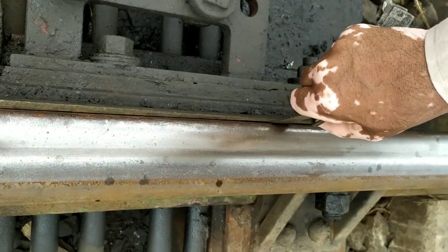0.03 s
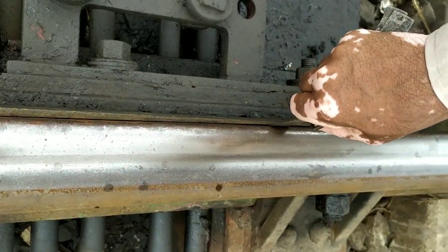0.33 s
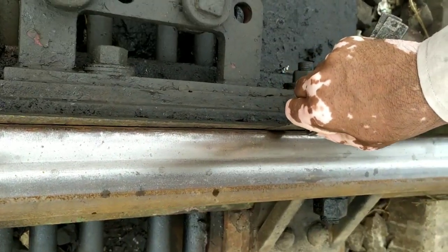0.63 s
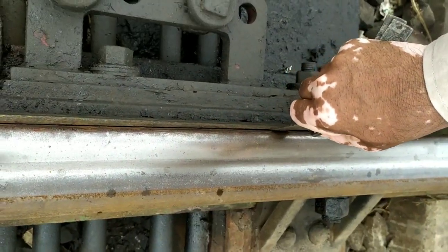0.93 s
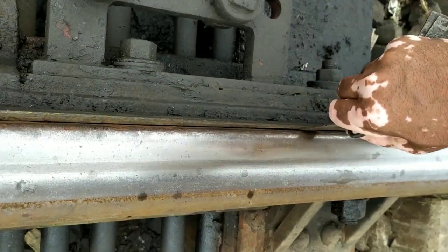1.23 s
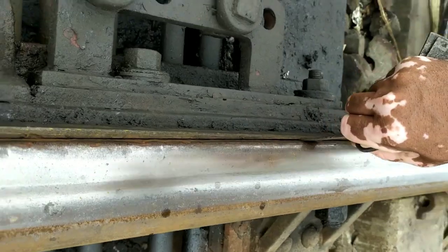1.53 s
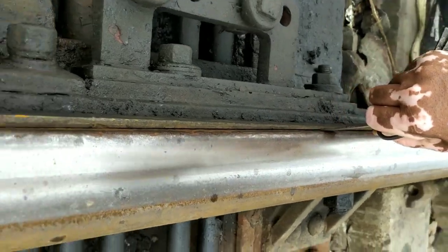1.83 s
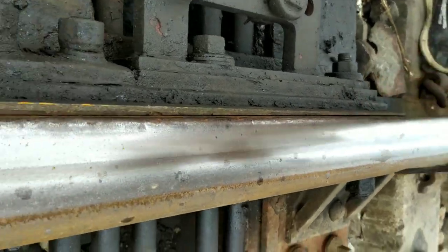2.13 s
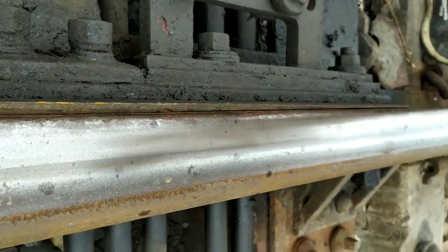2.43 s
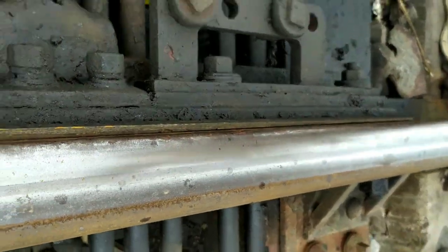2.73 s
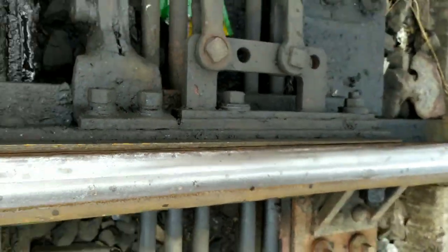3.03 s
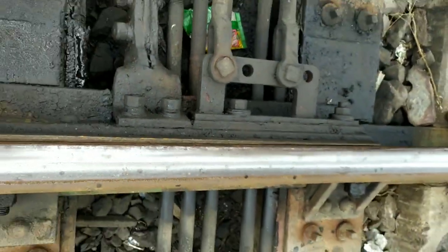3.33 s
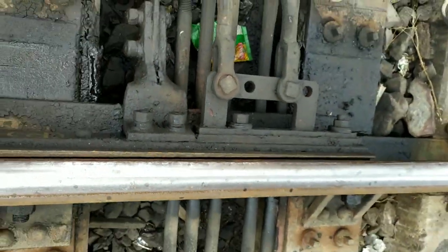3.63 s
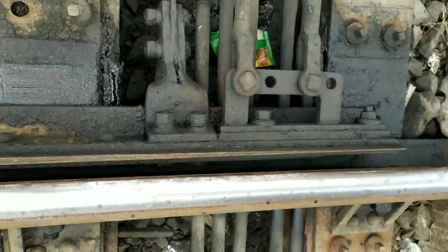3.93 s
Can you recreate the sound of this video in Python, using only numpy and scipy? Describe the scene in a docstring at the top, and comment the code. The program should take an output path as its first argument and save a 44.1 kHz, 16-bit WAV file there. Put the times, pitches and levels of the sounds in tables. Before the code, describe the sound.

A railway switch motor, heard close beside the track, winds up with whining, rattling gears, scraping steel and knocking rods. Before it starts, a soft click and a sharp tick sound over low outdoor rumble and a chirping bird.

```python
"""A low, uneven outdoor rumble and a faint steady tone, then a relay clicks beside a railway switch.
A small bird chirps, and a thin steel strip snaps off the rail with sharp ticks and a scrape.
From 3 s the point motor runs up: its gears whine at their mesh frequencies, tooth impacts excite
the modes of the housing into a rattle, and the rods clunk as they take the load."""
import sys
import numpy as np
from scipy import signal
from scipy.fft import rfft, irfft
from scipy.io import wavfile
from scipy.ndimage import uniform_filter1d

SR = 44100
rng = np.random.default_rng(int(sys.argv[2]) if len(sys.argv) > 2 else 0)


def int16_out(signal):
    """Quantize to a 16-bit WAV file."""
    q = np.round(np.clip(np.atleast_2d(signal).T, -1, 1) * 32767)
    wavfile.write(sys.argv[1], SR, q.astype(np.int16))


N = 176400
T = np.arange(N) / SR
HZ = np.fft.rfftfreq(N, 1 / SR)


def amp(db):
    """Decibels to amplitude ratio."""
    return 10 ** (np.asarray(db) / 20)


def unit(x):
    """Normalisation to rms 1."""
    return x / np.sqrt(np.mean(abs(x) ** 2) + 1e-20)


def curve(rows, column=1):
    """Linear interpolation of a column over time."""
    rows = np.array(rows)
    return np.interp(T, rows[:, 0], rows[:, column])


def per_bin(points):
    """Interpolation over log frequency."""
    hz, value = np.transpose(points)
    return np.interp(np.log(HZ + 1), np.log(hz + 1), value)


def noise():
    """Independent white noise for each ear."""
    return rng.standard_normal((2, N))


def wobble(rate_hz):
    """Random modulator: low-passed noise of rms 1."""
    return unit(irfft(rfft(rng.standard_normal(N)) / (1 + (HZ / rate_hz) ** 4), N))


def phase(hz):
    """Phase is the integral of frequency."""
    return 2 * np.pi * np.cumsum(hz) / SR


def resonance(hz, width_hz):
    """Unit-power response of two cascaded resonators."""
    return unit(1 / (1 + 2j * (HZ - hz) / width_hz) ** 2)


def shape(spectrum):
    """Unit-power response from relative levels."""
    return unit(amp(per_bin(spectrum)))


# Coherence of the switch's sound between the ears (frequency [Hz], correlation [-])
SWITCH_COHERENCE = [(50, .5), (90, .6), (150, .93), (300, .96), (600, .96), (1000, .75), (2300, .25),
                    (5000, -.1), (15000, 0)]
def colour(x, response, coherence=SWITCH_COHERENCE):
    """Filtering, then a cross-mix that sets interaural coherence."""
    left, other = rfft(x) * response
    shared = np.clip(per_bin(coherence), -1, 1)
    return irfft(np.array([left, shared * left + np.sqrt(1 - shared ** 2) * other]), N)


def pan(x, balance_db):
    """Interaural level difference, varying with frequency."""
    return irfft(rfft(x) * amp(np.array([[.5], [-.5]]) * per_bin(balance_db)), N)


def steady(x, seconds):
    """Division by the running rms flattens the envelope."""
    return x / np.sqrt(abs(uniform_filter1d((x ** 2).mean(0), int(seconds * SR))) + 1e-9)


def strike(s, db, rise, decay):
    """Impact envelope: linear rise, exponential decay."""
    return amp(db) * np.clip((T - s) / rise, 0, 1) * np.exp(-np.maximum(T - s - rise, 0) / decay)


def bursts(rows, spectrum):
    """Contact noise: impact envelopes sharing one spectrum."""
    return colour(noise() * sum(strike(*row) for row in rows), shape(spectrum))


NEAR_T60_S = .025
def echoes(x, t60):
    """Diffuse reflection from track and ballast: convolution with decaying noise."""
    tail = noise()[:, :SR // 2] * amp(-60 * T[:SR // 2] / t60)
    return signal.fftconvolve(x[None], tail / np.linalg.norm(tail[0]), axes=1)[:, :N]


# Spectra of rumble, distant wash and hiss (frequency [Hz], relative level [dB])
RUMBLE_SPECTRUM = [(15, -37), (30, -47), (42, -9), (54, -2.5), (82, -1.5), (105, -8.5), (160, -20.5),
                   (230, -33.5), (400, -60), (16000, -120)]
WASH_SPECTRUM = [(60, -20), (150, 0), (230, -3.5), (400, -9), (700, -19), (1500, -71), (16000, -90)]
HISS_SPECTRUM = [(290, -27), (500, -14), (800, 7), (1250, 2.5), (1800, 0.5), (2700, 1.5), (4300, 2),
                 (6000, -2.5), (7500, -6.5), (9500, -4.5), (11500, -12.5), (13600, -15), (16000, -23)]
# Envelopes of rumble, hiss and faint tone (time [s], level [dB])
RUMBLE_LEVEL = [(0, -43), (.12, -44), (.2, -36.5), (.28, -44.5), (.36, -38), (.45, -42.5), (.58, -49),
                (.64, -47.5), (1.5, -44), (1.86, -44), (2.52, -45.5), (4.0, -44.5)]
HISS_LEVEL = [(0, -58), (.55, -58.5), (.7, -55), (.95, -58), (1.5, -59), (3.0, -58.5)]
TONE_LEVEL = [(0, -71), (.24, -66), (.65, -62.5), (1.03, -61), (1.35, -72), (1.8, -84), (2.05, -70.5),
              (2.35, -64.5), (2.75, -68.5), (3.0, -76)]
# Coherence of the air (frequency [Hz], correlation [-])
AIR_COHERENCE = [(60, 0.81), (150, 0.71), (380, 0.84), (950, 0), (15000, 0.044)]
# Balance of the air (frequency [Hz], left minus right [dB])
AIR_BALANCE = [(60, -1), (150, -1), (380, 1.5), (950, 0.5), (2380, 0.5), (5980, 3.0), (15000, -1.5)]
def outdoors(wash_db=-58, tone_hz=920.5):
    """Ambient noise: a rumble swelling with wind and handling bumps, a wash, a hiss and a faint tone."""
    rumble = steady(colour(noise(), shape(RUMBLE_SPECTRUM), AIR_COHERENCE), 0.07)
    rumble *= amp(curve(RUMBLE_LEVEL))
    wash = colour(noise(), shape(WASH_SPECTRUM), AIR_COHERENCE) * amp(wash_db)
    hiss = colour(noise(), shape(HISS_SPECTRUM), AIR_COHERENCE)
    hiss *= amp(curve(HISS_LEVEL) + 0.6 * wobble(12))
    tone = np.sqrt(2) * np.sin(phase(tone_hz + 0.3 * wobble(8.4))) * amp(curve(TONE_LEVEL))
    return pan(rumble + wash + hiss + tone, AIR_BALANCE)


# Thuds and clanks (time [s], level [dB], frequency [Hz], bandwidth [Hz], decay [s])
THUD_HITS = [(0.004, -45.5, 179.5, 40, 0.06), (1.08, -45, 760, 260, 0.0026), (1.311, -37.5, 123, 60, 0.026),
             (2.019, -39.5, 312, 69.4, 0.021), (2.02, -47, 486, 199, 0.031),
             (3.433, -33.5, 286, 117, 0.035), (3.427, -32, 1970, 160, 0.0089),
             (3.447, -24.5, 518, 160, 0.011), (3.458, -35, 274, 50, .025)]
def thuds():
    """Damped resonance: each blow excites one narrow band, rising in about one period."""
    out = 0
    for s, db, hz, width, decay in THUD_HITS:
        band = steady(colour(noise(), resonance(hz, width)), 0.0107)
        out += band * strike(s, db, 1.05 / hz, decay)
    return out


# Closure and bounce (time [s], level [dB], rise [s], decay [s])
RELAY_HITS = [(0.086, -46.5, 0.0043, 0.0084), (0.1, -52.5, 0.0011, 0.018)]
# Contact noise (frequency [Hz], relative level [dB])
RELAY_SPECTRUM = [(200, -5), (550, 0), (850, 1), (1400, 1), (2400, -5), (4500, -8), (7000, -18),
                  (16000, -40)]
# Modes of the relay box (frequency [Hz], level [dB], decay [s])
BOX_MODES = [(560, -47.5, 0.019), (1430, -55, 0.011), (2380, -60, 0.017), (3666, -59, .01)]
def relay():
    """Free vibration: the relay closes, bounces once and leaves its box ringing."""
    onset = RELAY_HITS[0][0]
    ring = sum(np.sin(2 * np.pi * hz * T) * strike(onset, db, 0.0052, decay)
               for hz, db, decay in BOX_MODES)
    return bursts(RELAY_HITS, RELAY_SPECTRUM) + ring


# Calls (time [s], level of low notes [dB], level of high falling note [dB])
BIRD_CALLS = [(0.19, -62, -68), (0.43, -62, -66), (1.179, -62, -70), (1.42, -61, -70), (2.406, -49, -47.5),
              (2.647, -46.5, -44.5), (2.882, -45, -46), (3.123, -45, -47), (3.606, -42, -52)]
# Notes of a call (delay [s], duration [s], start [Hz], middle [Hz], end [Hz], relative level [dB])
BIRD_NOTES = [(-.034, .026, 4000, 4100, 4070, -7.5), (0, .028, 6440, 6000, 4590, -4),
              (0.026, .048, 3340, 4477, 4800, -1)]
def bird(high_above_hz=6000, far_db=-1.5, near_db=-2.5):
    """Frequency modulation: each call is a soft flat note, a quick high fall and a rising sweep."""
    song = np.zeros(N)
    for s, low_db, high_db in BIRD_CALLS:
        for delay, length, start, middle, end, db in BIRD_NOTES:
            progress = np.arange(0, 1, 1 / (length * SR))
            glide = np.polyval(np.polyfit([0, .5, 1], [start, middle, end], 2), progress)
            hz = glide * (1 + 0.0043 * rng.standard_normal())
            gain = amp(db + (high_db if start > high_above_hz else low_db))
            note = gain * abs(np.sin(np.pi * progress)) ** .6 * np.sin(phase(hz))
            at = max(round((s + delay) * SR), 0)
            song[at:at + len(note)] += note
    return song + amp(far_db) * echoes(song, t60=0.52) + amp(near_db) * echoes(song, NEAR_T60_S)


# Ticks of the strip (time [s], level [dB], rise [s], decay [s])
STRIP_TICKS = [(1.369, -51.5, .001, 0.0024), (1.668, -45, 0.00036, 0.0021), (2.018, -31, 0.0051, 0.0036),
               (2.0245, -23, 0.00024, 0.0013), (2.0278, -44, .0005, 0.012)]
# Their spectrum (frequency [Hz], relative level [dB])
STRIP_SPECTRUM = [(600, -3.5), (2000, -17.5), (3700, -6.5), (4700, -8), (5750, 7), (6900, -14.5),
                  (8600, 3.5), (9900, -6), (11200, 6), (12500, -3.5), (16000, -8)]
def steel_strip():
    """Impulsive excitation: the strip's brief snaps reach far into the treble."""
    return bursts(STRIP_TICKS, STRIP_SPECTRUM)


# Squeals (time [s], duration [s], frequency [Hz], level [dB])
STEEL_SQUEALS = [(1.845, .09, 6910, -65), (3.204, 0.081, 6260, -46), (3.7, 0.2, 10530, -58)]
def squeals(wander=.012, rasp=.025):
    """Friction-induced vibration: dry sliding steel rasps on a wandering pitch."""
    out = np.zeros(N)
    for s, length, hz, db in STEEL_SQUEALS:
        swell = np.sin(np.pi * np.clip((T - s) / length, 0, 1))
        pitch = hz * (1 + wander * wobble(23) + rasp * wobble(277))
        out += amp(db) * swell * np.sin(phase(pitch))
    return out + echoes(out, NEAR_T60_S)


# Scrapes (time [s], level [dB], rise [s], decay [s])
STEEL_SCRAPES = [(2.054, -44.5, 0.006, 0.0076), (3.075, -41, 0.02, 0.024), (3.106, -39.5, 0.0051, 0.016),
                 (3.14, -45.5, 0.0093, 0.016), (3.408, -38.5, 0.008, 0.036), (3.80, -54, 0.017, 0.036)]
# Their spectrum (frequency [Hz], relative level [dB])
SCRAPE_SPECTRUM = [(1000, 2), (4000, 5.5), (6500, -0.5), (8500, -0.5), (11000, 4.5), (13500, 1),
                   (16000, -9)]
def scrapes():
    """Sliding friction: steel on steel gives broadband noise."""
    return bursts(STEEL_SCRAPES, SCRAPE_SPECTRUM)


def tooth_impacts(per_second=830, spread_db=-2, decay_s=0.00037, hiss=1):
    """Shot noise: gear teeth knock at random over a sliding hiss."""
    hits = rng.random(N) < per_second / SR
    clicks = hits * amp(spread_db * np.minimum(rng.exponential(1, N), 4))
    envelope = signal.lfilter([1], [1, -np.exp(-1 / (decay_s * SR))], clicks)
    return unit(noise() * (unit(envelope) + hiss))


def casing(x, t60=.07, patch_db=2.4, patch_hz=300, patch_s=.04):
    """Modal overlap: many small modes ring, and shifting contact swells and fades patches of them."""
    tail = noise()[:, :SR // 10] * amp(-60 * T[:SR // 10] / t60)
    ringing = x + unit(signal.oaconvolve(x, tail, axes=1)[:, :N])
    hz, t, spectra = signal.stft(ringing, SR, nperseg=512)
    patches = uniform_filter1d(rng.standard_normal(spectra.shape[1:]), round(patch_hz / hz[1]), axis=0)
    patches = uniform_filter1d(patches, round(patch_s / t[1]), axis=1)
    return unit(signal.istft(spectra * amp(patch_db * unit(patches)), SR)[1][:, :N])


def drift(x, depth=.008):
    """A randomly varying delay bends the pitch."""
    warped = T + np.cumsum(depth * wobble(9)) / SR
    return np.array([np.interp(warped % T[-1], T, ear) for ear in x])


# Gear rattle (time [s], midrange level [dB], treble level [dB])
RATTLE_LEVELS = [(2.97, -100, -100), (3.02, -55, -74), (3.065, -51.5, -49.5), (3.09, -47, -63),
                 (3.16, -38.5, -43), (3.24, -37, -37), (3.37, -35, -39), (3.40, -37, -37.5),
                 (3.48, -38, -42), (3.75, -39, -40.5), (3.81, -34, -34.5), (3.86, -39, -38),
                 (3.90, -38, -36), (4.0, -40, -34.5)]
# Its two bands (frequency [Hz], relative level [dB])
MID_SPECTRUM = [(60, -6.5), (130, 2), (270, 0.5), (345, -7), (440, -2.5), (620, -9), (760, -4.5), (1020, 1),
                (1300, -4), (1650, 5), (1900, -10), (2400, -7), (3000, -25), (16000, -70)]
TREBLE_SPECTRUM = [(900, -51), (1700, -11.5), (2200, 3), (2550, 1), (2950, 2.5), (3350, 6.5), (4100, 0.5),
                   (4700, -3), (5500, -0.5), (6250, -5.5), (6900, -13), (8500, -13.5), (11000, -18.5),
                   (13500, -22.5), (16000, -49)]
# Housing modes (frequency [Hz], bandwidth [Hz], level re midrange [dB])
HOUSING_MODES = [(269, 20, -15), (439.3, 20, -12), (488.6, 12.5, -7.5), (1110, 18, -10.5), (1356, 100, -2),
                 (1588, 53, -14.5), (2110, 75, -10.5), (2271, 94, -8.5), (3215, 68, -18), (4040, 60, -16),
                 (4510, 47, -15.5)]
def gear_rattle(swell_db=2.5):
    """Forced vibration: tooth impacts drive the housing, whose modes swell in three groups."""
    drive = casing(tooth_impacts())
    interleaved = np.array(HOUSING_MODES)[np.argsort(np.arange(len(HOUSING_MODES)) % 3)]
    ring = 0
    for group in np.array_split(interleaved, 3):
        modes = sum(amp(db) * resonance(hz, width) for hz, width, db in group)
        ring += drift(colour(tooth_impacts(), modes)) * unit(amp(swell_db * wobble(20)))
    middle = colour(drive, shape(MID_SPECTRUM)) + ring
    treble = colour(drive, shape(TREBLE_SPECTRUM))
    return middle * amp(curve(RATTLE_LEVELS)) + treble * amp(curve(RATTLE_LEVELS, 2))


# Hum under changing load (time [s], cover level [dB], rod level [dB])
DRONE_LEVELS = [(2.99, -74, -103), (3.02, -57.5, -50.5), (3.064, -36.5, -50), (3.11, -45, -69),
                (3.19, -27, -39.5), (3.25, -51, -65), (3.275, -32.5, -37), (3.37, -35.5, -37),
                (3.41, -38, -43), (3.455, -36.5, -40), (3.505, -47, -33.5), (3.59, -41.5, -47.5),
                (3.76, -40, -56), (3.804, -33, -47), (3.86, -37.5, -50), (4.0, -36, -55)]
def drone(cover_hz=568.5, rods_hz=170.1, wander=.035):
    """Resonance: cover and rods hum at their natural frequencies."""
    cover = steady(colour(noise(), resonance(cover_hz, width_hz=69.6)), 0.025)
    pitch = rods_hz * (1 + wander * wobble(15.8))
    rods = np.sqrt(2) * np.sin(phase(pitch)) * (1 + 0.33 * wobble(44))
    return cover * amp(curve(DRONE_LEVELS)) + rods * amp(curve(DRONE_LEVELS, 2))


# Run-up (time [s], first mesh frequency [Hz], first mesh level [dB], second mesh level [dB])
RUN_UP = [(3.03, 398.8, -64.5, -67), (3.11, 477.3, -48.5, -63), (3.168, 561, -27.5, -48),
          (3.215, 607.2, -34, -51), (3.26, 650, -52, -67), (3.44, 874.7, -63, -70), (3.49, 915, -35.5, -63),
          (3.57, 995, -43.5, -67), (3.62, 1037, -60, -67), (3.72, 1125, -41, -46),
          (3.775, 1146, -46, -42.5), (3.80, 1153, -50, -29), (3.835, 1154, -59, -33),
          (3.858, 1156, -55, -50), (3.885, 1174, -39, -30.5), (3.95, 1194, -49, -28), (4.0, 1209, -39, -29)]
# Overtones of the second mesh (harmonic number [-], relative level [dB])
MESH_HARMONICS = [(2, -20), (3, -25)]
def gear_whine(mesh_ratio=1.14, waver=0.004, roughness=0.3):
    """Periodic tooth meshing: two tones climb with motor speed and swell as they cross resonances."""
    angle = phase(curve(RUN_UP) * (1 + waver * wobble(49.4)))
    first = np.sin(angle) * (1 + roughness * wobble(97))
    second = np.sin(mesh_ratio * angle) * (1 + roughness * wobble(100))
    for k, db in MESH_HARMONICS:
        second += amp(db) * np.sin(k * mesh_ratio * angle) * (1 + roughness * wobble(90))
    running = T > RUN_UP[0][0]
    return np.sqrt(2) * (first * amp(curve(RUN_UP, 2)) + second * amp(curve(RUN_UP, 3))) * running


# Clunks of the linkage (time [s], level [dB], rise [s], decay [s])
ROD_CLUNKS = [(3.219, -29, .003, 0.023), (3.417, -21, 0.0062, 0.014), (3.427, -19.5, 0.0018, 0.0099),
              (3.792, -32, 0.0036, 0.0099)]
# Their spectrum (frequency [Hz], relative level [dB])
CLUNK_SPECTRUM = [(60, -39), (110, -9), (200, -12), (600, -7), (800, -13), (1020, -6), (1350, -12.5),
                  (1630, -5.5), (1770, -7.5), (1960, 0), (2370, -10), (4840, -13.5), (6100, -23),
                  (15000, -49)]
def clunks():
    """Impact noise: the rods knock as they take the load."""
    return bursts(ROD_CLUNKS, CLUNK_SPECTRUM)


# Balance of switch and bird (frequency [Hz], left minus right [dB])
SOURCE_BALANCE = [(60, 0), (150, .5), (400, 1), (1000, 1.9), (2400, 3.7), (6000, 4.4), (15000, 6.5)]
def scene():
    """Superposition: the switch and the bird, towards the left, in the open air."""
    motor = gear_rattle() + drone() + gear_whine()
    contacts = squeals() + thuds() + relay() + steel_strip() + scrapes() + clunks()
    return pan(motor + contacts + bird(), SOURCE_BALANCE) + outdoors()


def record(dry, ceiling=.45, cutoff_hz=15950):
    """Soft saturation rounds the peaks; a low-pass filter limits the band."""
    soft = ceiling * np.tanh(dry / ceiling)
    lowpass = signal.firwin(511, cutoff_hz, window=("kaiser", 9), fs=SR)
    return signal.oaconvolve(soft, lowpass[None], "same")


dry = scene()
out = record(dry)
int16_out(out)
```